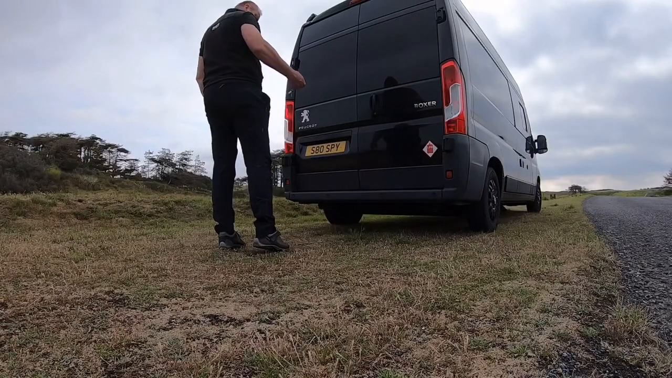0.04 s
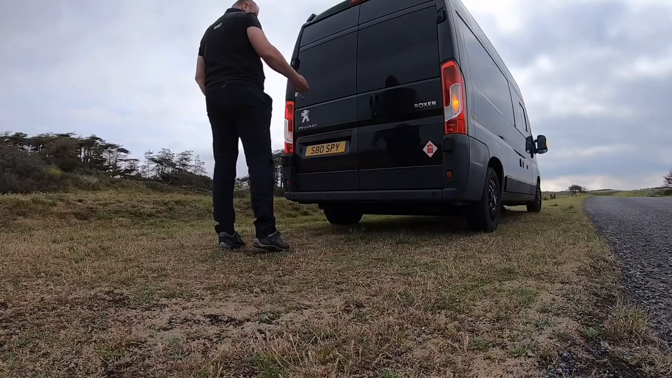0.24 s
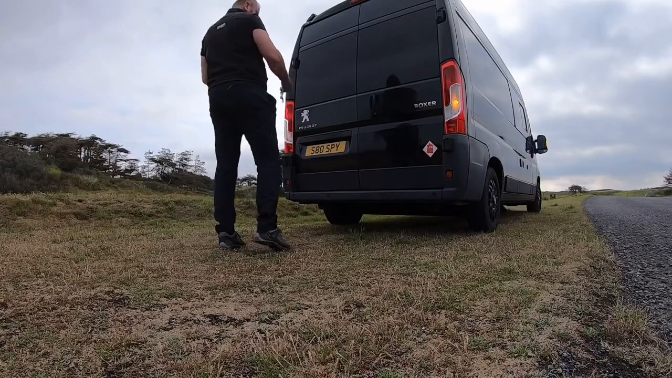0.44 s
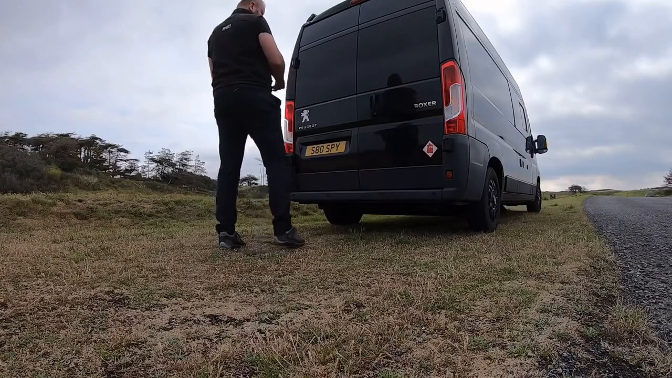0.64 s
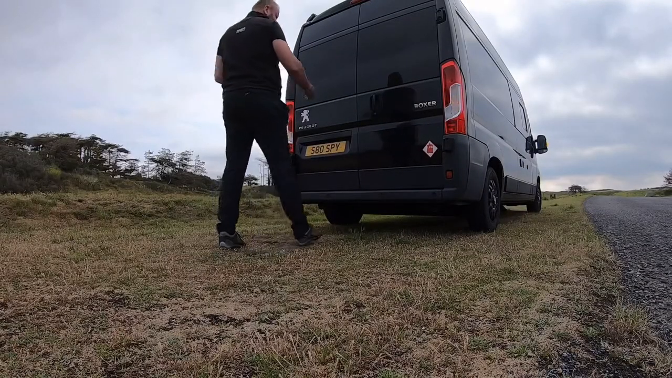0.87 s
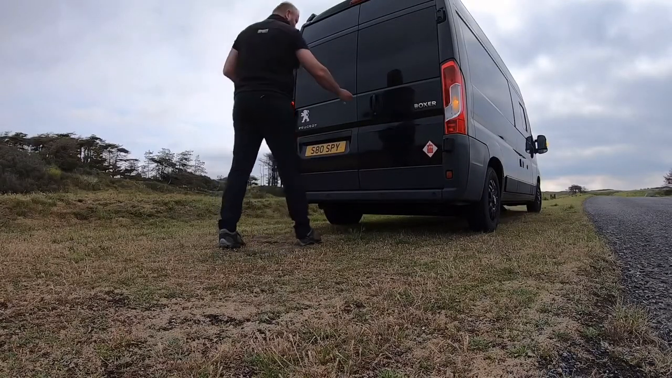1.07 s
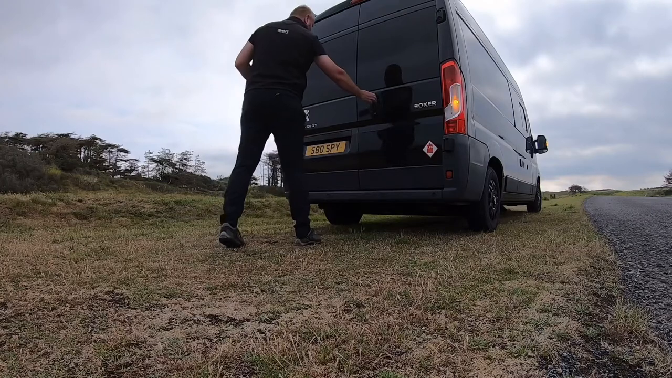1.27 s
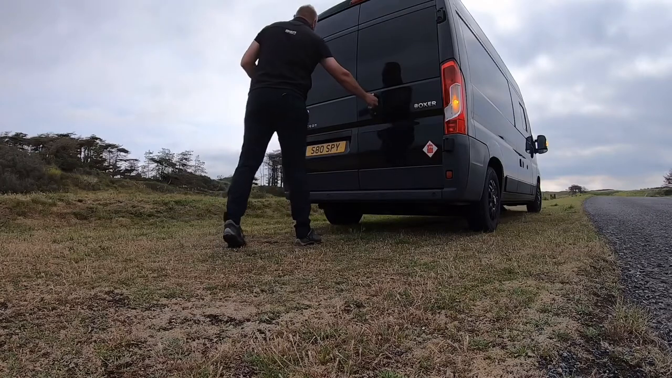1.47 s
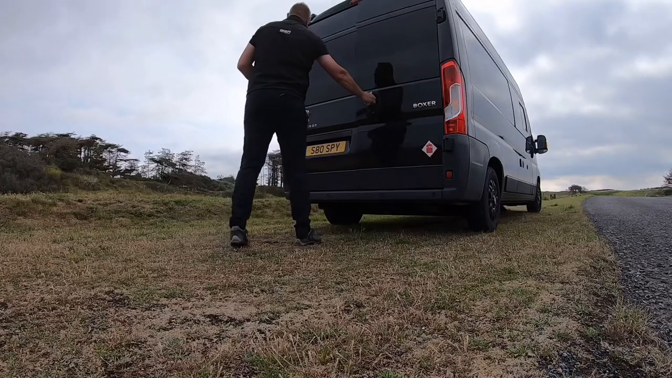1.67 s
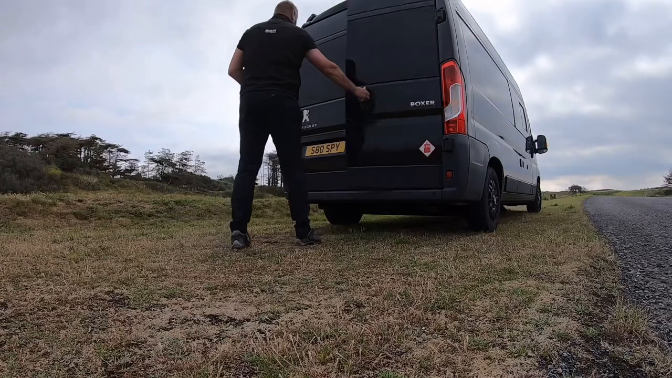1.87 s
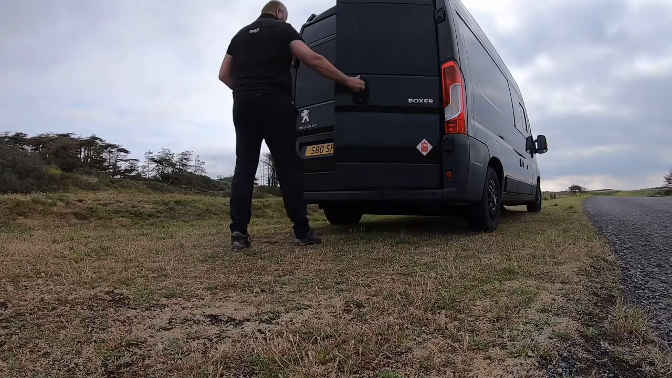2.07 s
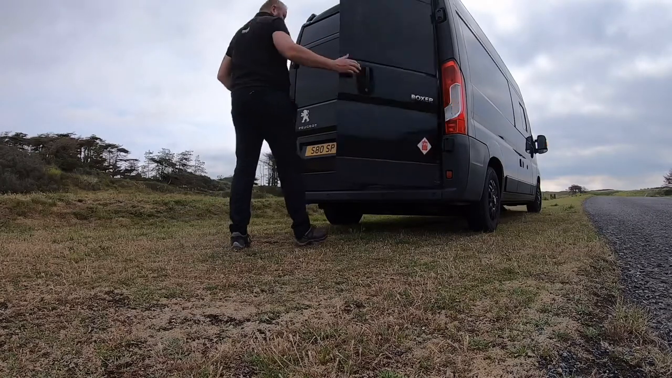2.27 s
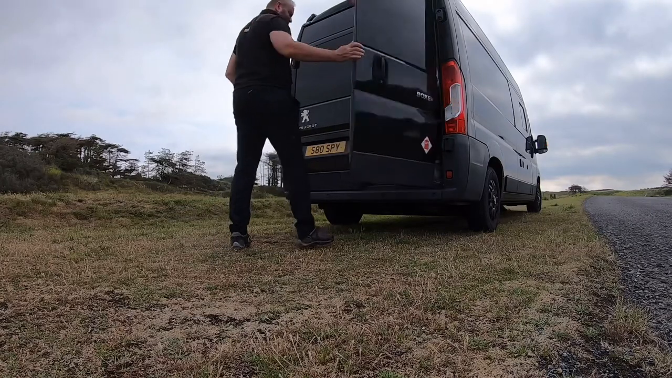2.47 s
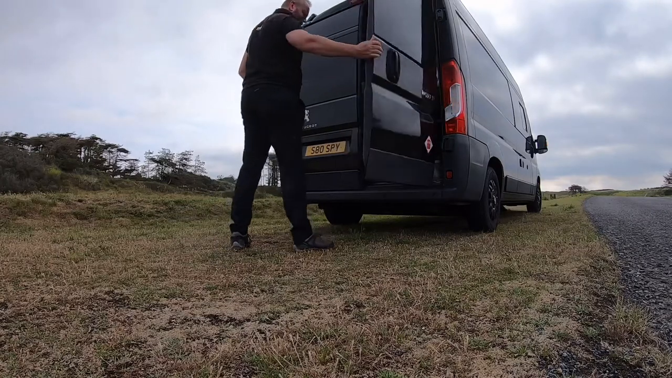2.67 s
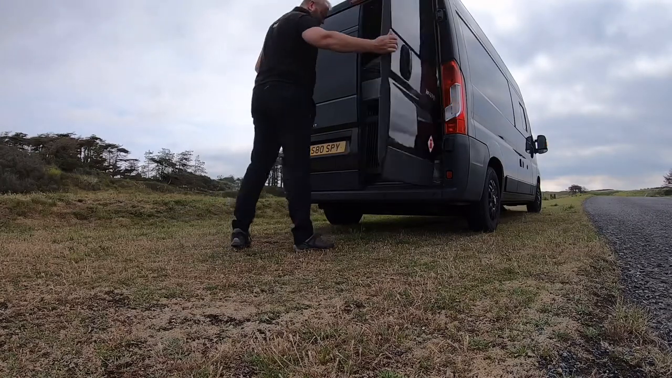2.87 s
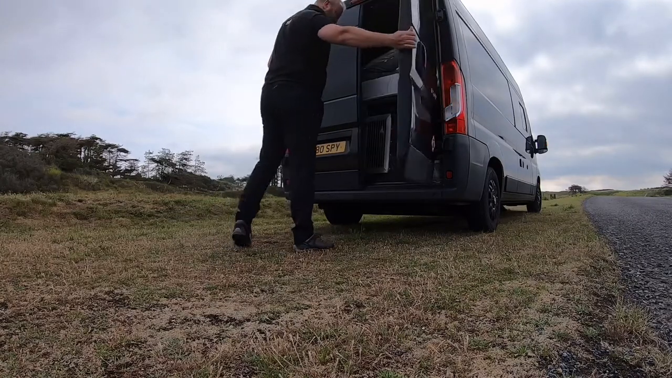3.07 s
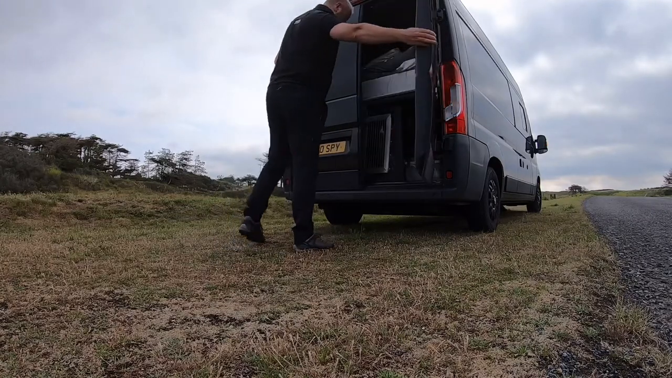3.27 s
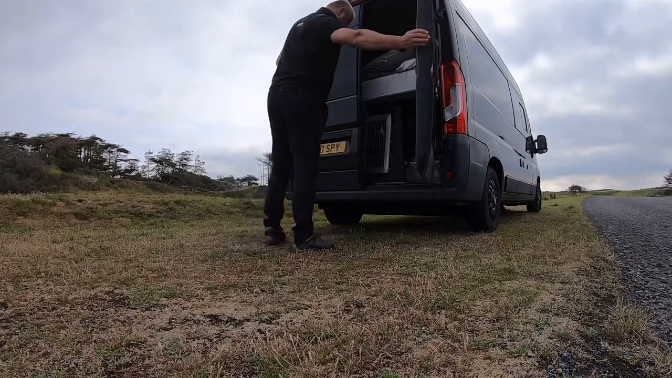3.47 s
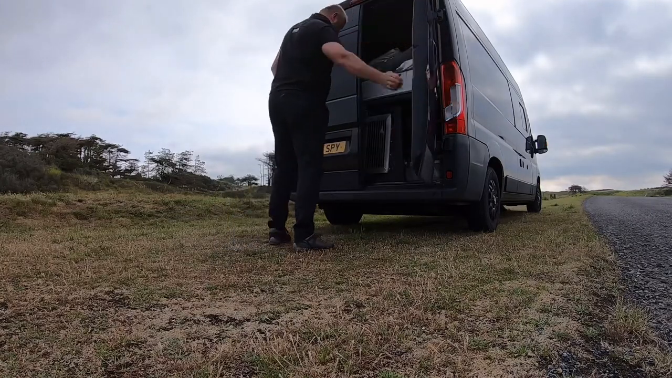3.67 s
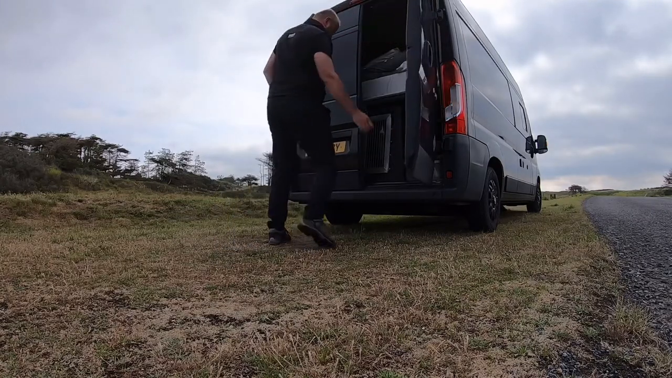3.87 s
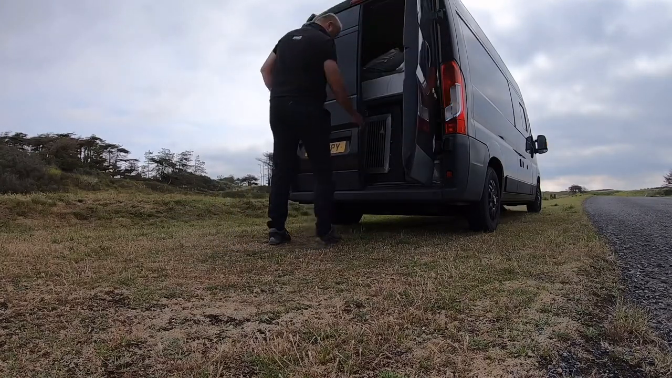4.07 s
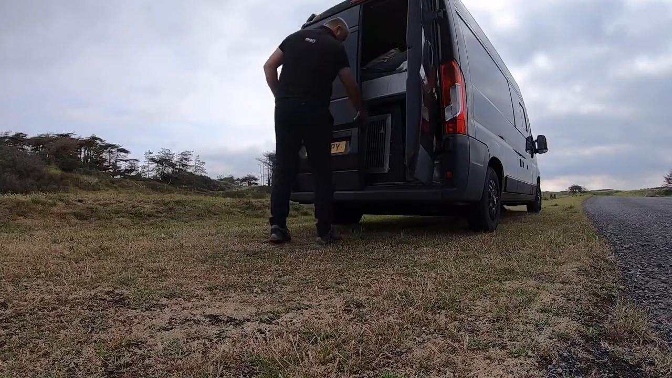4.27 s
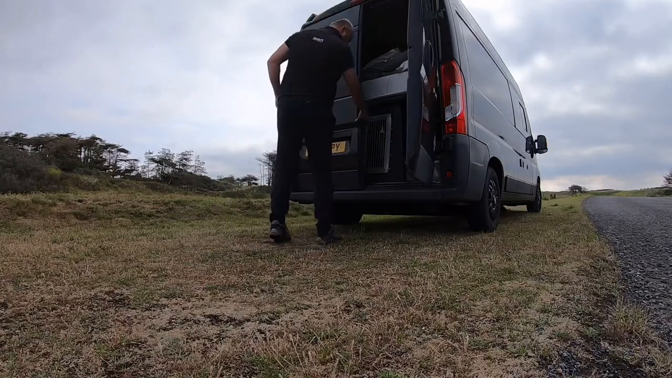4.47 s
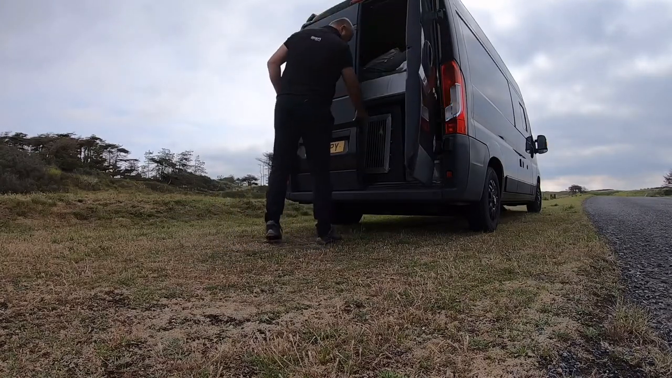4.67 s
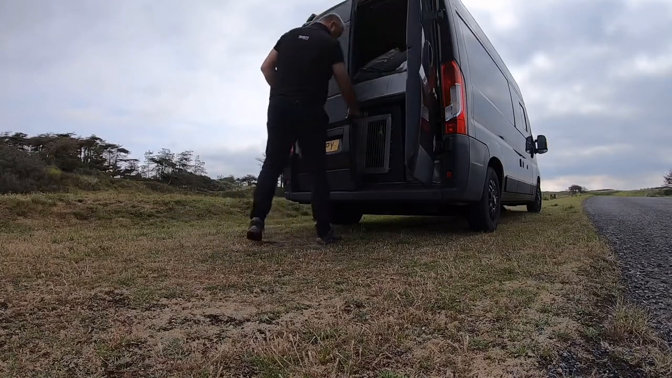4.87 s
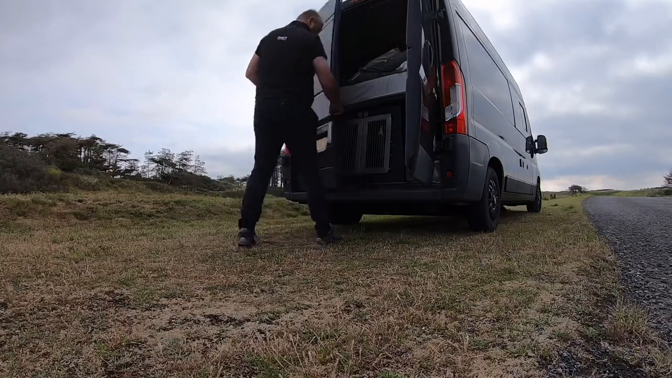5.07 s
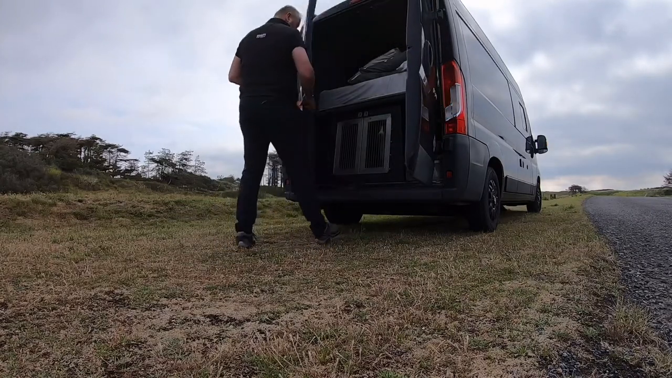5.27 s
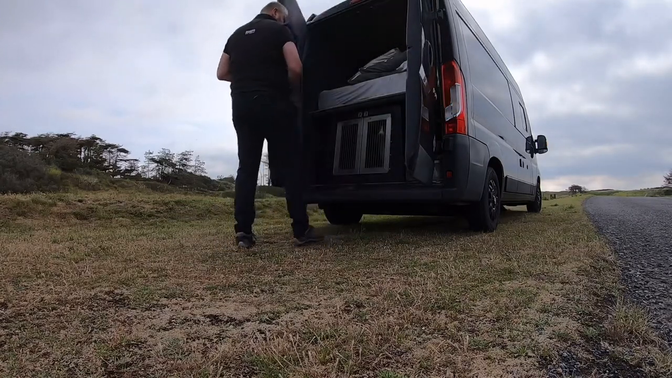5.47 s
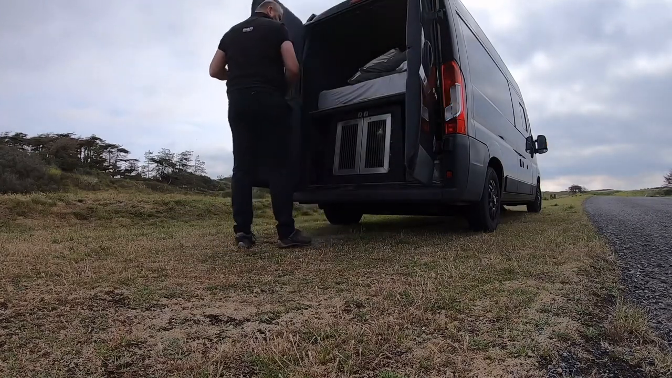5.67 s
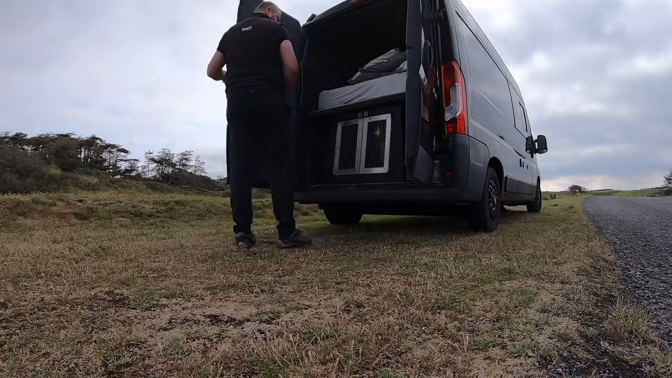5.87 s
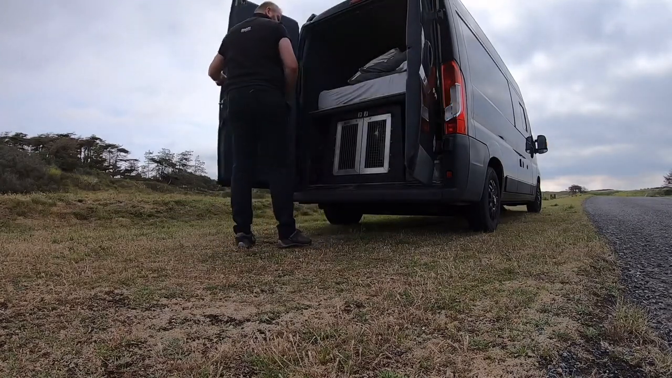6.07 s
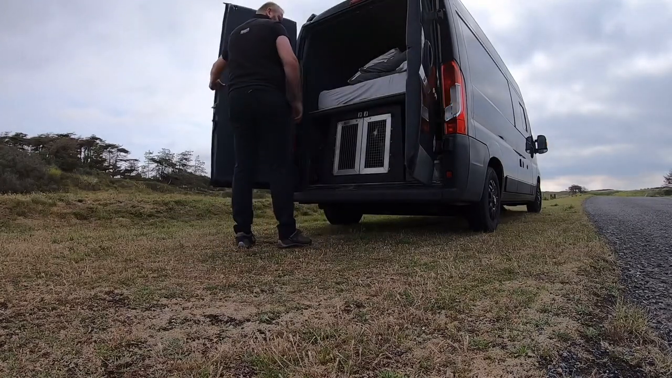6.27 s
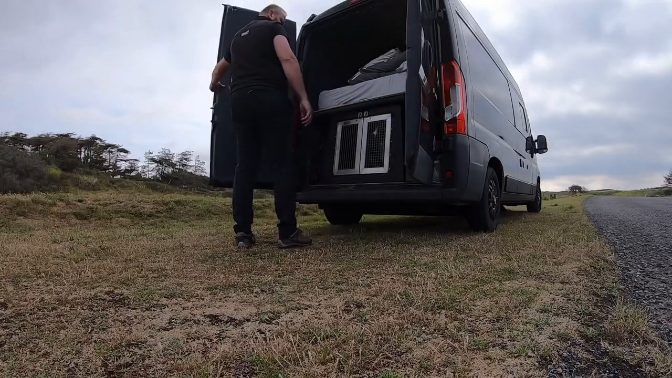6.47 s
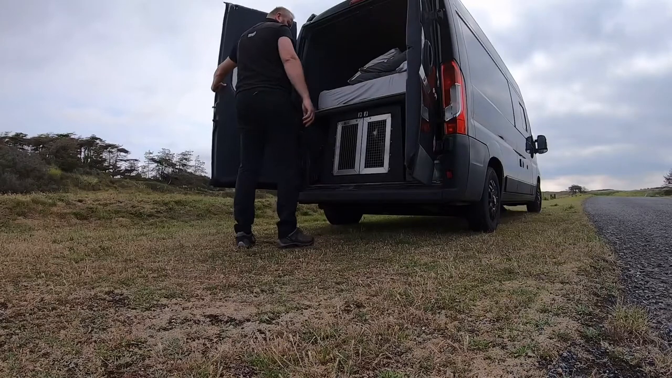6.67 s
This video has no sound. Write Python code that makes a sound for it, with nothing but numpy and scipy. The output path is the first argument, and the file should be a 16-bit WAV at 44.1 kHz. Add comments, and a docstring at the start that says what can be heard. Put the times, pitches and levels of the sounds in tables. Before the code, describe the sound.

Keys jingle beside a van, then its rear door latches clunk loudly and release, with hollow body thuds, light rattles, breeze and faint birdsong outdoors.

```python
"""Windy grass verge: the rear doors of a van are unlatched and swung open.
Blows set door modes ringing, latch parts rattling as banded noise and the body humming.
Keys, handle, pawl, hinge stay and inner lever are scratch-excited modes.
Random snaps give the rustle of dry grass and the hiss of the doors after blows.
Wind and body rumble, far traffic and breeze are coloured noise; a far bird is gliding sines."""
import sys
import numpy as np
from scipy import signal
from scipy.fft import rfft, irfft
from scipy.io import wavfile

SR = 44100
rng = np.random.default_rng(int(sys.argv[2]) if len(sys.argv) > 2 else 0)


def unload_wav(signal):
    """Save mono or channel-first audio to the path in sys.argv[1] as 16-bit WAV at rate SR, clipped to [-1, 1]."""
    wavfile.write(
        sys.argv[1],
        SR,
        np.round(np.clip(np.atleast_2d(signal).T, -1, 1) * 32767).astype(np.int16),
    )


N = 296352
CONTROL_STEP = 32   # samples between swell levels
DRIFT_STEP = 40   # samples between drift values
BAND_EDGES_HZ = 60 * 2 ** np.arange(0, 8.1, .5)   # half octaves
MODE_SPREAD_DB, TIGHT_SPREAD_DB = 2.5, 1.2   # random spread of each mode's strength per touch


def from_db(db):
    """Decibels to gain."""
    return 10 ** (np.asarray(db) / 20)


def rms_one(x):
    """Scale to unit rms."""
    return x / np.sqrt(np.mean(x ** 2) + 1e-20)


def at_hz(points, hz):
    """Interpolate a curve on a log-frequency axis."""
    curve_hz, values = np.array(points).T
    return np.interp(np.log(hz), np.log(curve_hz), values)


def drift(rate_hz):
    """Slow random signal of rms 1: noise through two equal real poles."""
    pole = np.exp(-2 * np.pi * DRIFT_STEP * rate_hz / SR)
    white = rng.standard_normal(N // DRIFT_STEP + 2002)
    slow = signal.lfilter([1], [1, -2 * pole, pole * pole], white)[2000:]
    return np.interp(np.arange(N) / DRIFT_STEP, np.arange(len(slow)), rms_one(slow))


def band(x, low_hz, high_hz):
    """Butterworth band-pass."""
    sos = signal.butter(2, [low_hz, high_hz], "band", fs=SR, output="sos")
    return signal.sosfilt(sos, x)


def ring(clicks, hz, t60_s):
    """Two-pole resonator: a unit click starts a decaying sine of height 1."""
    r = from_db(-60 / (t60_s * SR))
    w = 2 * np.pi * hz / SR
    return signal.lfilter([0, np.sin(w)], [1, -2 * r * np.cos(w), r * r], clicks + 1e-18)


def stereo(mid, side, alike):
    """Mid and side to left and right; independent inputs of equal power correlate by alike."""
    alike = np.clip(alike, -1, 1)
    return np.sqrt(1 + alike) * mid + np.sqrt(1 - alike) * side * [[1], [-1]]


def coloured(spectrum, alike):
    """Stereo noise of rms 1 with a spectrum and a likeness by frequency."""
    hz = np.maximum(np.arange(N // 2 + 1) * SR / N, 1)
    mid, side = rfft(rng.standard_normal((2, N))) * from_db(at_hz(spectrum, hz))
    return rms_one(irfft(stereo(mid, side, at_hz(alike, hz)), N))


def swell(start_s, hold_s, level_db, rise_s, fall_s):
    """One swell in dB: climb, hold, fall; rise_s and fall_s each span 40 dB."""
    t = np.arange(0, N + CONTROL_STEP, CONTROL_STEP) / SR
    before = (start_s - t) / rise_s
    after = (t - start_s - hold_s) / fall_s
    return level_db - 40 * np.maximum(0, np.maximum(before, after))


def summed(levels_db, rest_db):
    """Gain of overlapping swells, added as power over a resting level."""
    power = from_db(rest_db) ** 2 + np.sum(from_db(levels_db) ** 2, axis=0)
    return np.interp(np.arange(N) / CONTROL_STEP, np.arange(len(power)), np.sqrt(power))


def struck(events, modes, spread_db, crack_db, crack_t60_s, alike):
    """Each touch is a decaying noise scratch: it excites every mode and is heard itself as a crack."""
    at_s, level_db = np.array(events).T
    at = (at_s * SR).astype(int)
    luck = rng.normal(0, 1, (len(at), len(modes)))
    clicks = np.zeros((2, N))
    noise = stereo(*rng.standard_normal((2, N)), alike)
    fade = from_db(-60 / (crack_t60_s * SR))
    out = 0
    for k, (hz, mode_db, t60_s) in enumerate(modes):
        clicks[:, at] = from_db(level_db + mode_db + spread_db * luck[:, k])
        # unit-energy scratch
        scratch = signal.lfilter([np.sqrt(1 - fade ** 2)], [1, -fade], clicks) * noise
        out = out + ring(scratch, hz, t60_s)
    clicks[:, at] = from_db(level_db + crack_db)
    crack = signal.lfilter([1], [1, -fade], clicks) * noise
    return out + band(crack, modes[0][0], modes[-1][0])


# far traffic and breeze spectrum: pitch_hz, relative_level_db_per_hz
AIR_SPECTRUM = [(59, -34), (105, -24), (177, 11), (437, -14.5), (517, -10), (821, 0.5), (1010, -7.5),
                (2670, -12), (6740, -20), (8150, -27), (9060, -20), (15300, -41)]
# left-right likeness: pitch_hz, likeness
AIR_LIKENESS = [(100, 0.32), (400, .9), (1000, 0.28), (4000, 0.95), (12000, 0.13)]
# level curve: time_s, level_db
AIR_LEVEL = [(0, -73.5), (1.3, -71.5), (2.8, -73.5), (3.5, -72), (4.4, -71.5), (5.6, -72.5), (6.0, -73),
             (6.72, -74.5)]


def air():
    """Far traffic and breeze: steady coloured noise on a slowly drifting level."""
    time_s, level_db = np.transpose(AIR_LEVEL)
    level_db = np.interp(np.arange(N) / SR, time_s, level_db)
    return from_db(level_db + 1.2 * drift(3.4)) * coloured(AIR_SPECTRUM, AIR_LIKENESS)


# rumble spectrum: pitch_hz, relative_level_db_per_hz
RUMBLE_SPECTRUM = [(14, -30), (25, -9.5), (40, 0), (80, -1.5), (130, -11.5), (250, -33), (400, -76.5)]
# left-right likeness: pitch_hz, likeness
RUMBLE_LIKENESS = [(20, .7), (60, .8), (120, .995)]
# wind buffets, and thumps of the van body at heavy blows: start_s, hold_s, level_db
RUMBLES = [(0.0, 0.017, -45), (0.231, 0.11, -38), (.47, 0.014, -47), (1.533, 0.14, -28),
           (1.963, 0.048, -44), (2.107, 0.55, -39.5), (3.035, 0.059, -48), (3.198, 0.1, -48.5),
           (3.8, 0.074, -46), (3.921, 0.16, -43), (4.536, 0.091, -32.5), (4.217, 0.11, -64),
           (4.69, 0.085, -50.5), (5.493, 0.047, -67.5), (5.768, 0.19, -53), (6.09, 0.055, -47.5),
           (6.4, .3, -57.5)]
RUMBLE_RISE_S, RUMBLE_FALL_S, CALM_DB = .05, .18, -86   # rise and fall per 40 dB


def rumble():
    """Low rumbles, partly unlike left to right: wind buffets, and van body thumps at heavy blows."""
    level = summed([swell(*row, RUMBLE_RISE_S, RUMBLE_FALL_S) for row in RUMBLES], CALM_DB)
    return level * from_db(3.0 * drift(12)) * coloured(RUMBLE_SPECTRUM, RUMBLE_LIKENESS)


# dry grass underfoot, and the hiss of the doors after blows:
# start_s, hold_s, level_db, tilt_db_per_octave
RUSTLES = [(0.0, 0.19, -71.5, 11), (0.226, 0.062, -53, -14), (0.327, .12, -65, 4), (.56, 0.11, -62, 15),
           (0.812, 0.068, -60.5, 7.5), (1.045, 0.82, -61, -2.5), (1.6, 0.29, -70, -17.5),
           (1.854, 0.29, -50, -7.5), (2.203, 0.11, -60, -12), (2.603, 0.058, -62.5, -7.5),
           (2.9, 0.29, -66, -7), (3.493, .05, -60, -6.5), (3.823, 0.052, -61.5, 5),
           (4.052, 0.093, -60.5, 7.5), (4.225, .12, -71, 0.5), (4.6, 0.18, -63, -10.5),
           (4.992, 0.65, -60, -10.5), (5.442, 0.018, -62.5, 13.5), (6.271, 0.047, -72, 4.5)]
# rustle spectrum: pitch_hz, relative_level_db_per_half_octave
RUSTLE_SPECTRUM = [(500, -24), (1000, -8.5), (2000, -1), (3500, 2), (7000, -15), (12000, -18.5)]
RUSTLE_RISE_S, RUSTLE_FALL_S, STILL_DB = 0.052, .22, -82   # rise and fall per 40 dB
SNAPS_PER_S, SNAP_SPREAD_DB, PATCHY_DB = 2500, 2.8, 2.2


def rustle():
    """Rustling swells of dense snaps: dry grass underfoot, and the hiss of the doors after blows."""
    sizes_db = SNAP_SPREAD_DB * np.minimum(rng.exponential(1, (2, N)), 5)
    sizes = from_db(sizes_db) * rng.choice([-1, 1], (2, N))
    snaps = sizes * (rng.random((2, N)) < SNAPS_PER_S / SR)
    levels_db = np.array([swell(*row[:3], RUSTLE_RISE_S, RUSTLE_FALL_S) for row in RUSTLES])
    tilt_db = np.array(RUSTLES)[:, 3:]
    out = 0
    for low_hz, high_hz in zip(BAND_EDGES_HZ[6:], BAND_EDGES_HZ[7:]):
        hz = np.sqrt(low_hz * high_hz)
        octaves = np.log2(min(hz, 7000) / 2500)
        level = summed(levels_db + tilt_db * octaves, STILL_DB)
        colour = from_db(at_hz(RUSTLE_SPECTRUM, hz) + PATCHY_DB * drift(18))
        out = out + rms_one(band(snaps, low_hz, high_hz)) * level * colour
    return from_db(-14.0 + 0.5 * drift(25)) * stereo(*out, 0.084)


# blows on the doors: time_s, crack_db, crack_centre_octaves_over_1_khz,
# thud_db, thud_centre_octaves_over_100_hz
BLOWS = [(0.0044, -47.5, 0.5, -48, 1.18), (0.2026, -44, 0.1, -49, 1), (0.2329, -38.5, 1.12, -41, 3.2),
         (0.2493, -30.5, 1.1, -59, 1.2), (0.275, -34, 0.5, -36.5, 1.45), (0.6068, -50.5, 0.8, -52, 2.24),
         (1.1042, -61, 2.1, -97, 1), (1.4346, -48.5, 0.74, -41.5, 0.94), (1.4624, -48.5, 1, -42, 1.13),
         (1.5183, -42, 1, -28.5, 3), (1.5357, -20, 2, -9.5, 0.61), (1.562, -24, 1, -33, -0.019),
         (1.582, -38.5, 1.7, -26, 0.77), (1.625, -37, 1.53, -42, 0.36), (1.6481, -28.5, .8, -31, 2.7),
         (1.8462, -33, 1.54, -39, .8), (2.0465, -41, 2.4, -45, 0.75), (2.107, -14.5, 1.2, -8.5, 1.08),
         (2.2995, -50, 0.47, -31.5, 0.97), (2.4214, -65, 2, -43, 0.12), (2.5867, -56, 0.84, -42, -0.61),
         (2.9629, -59, 0.75, -55.5, 0.35), (3.0353, -71.5, 1, -32.5, 0.93), (4.061, -45, 1, -54, 1.1),
         (4.365, -78.5, 2, -56, 0.93), (4.4651, -48.5, 1.9, -48.5, 2.7), (4.5144, -19, 2, -29.5, 3.1),
         (4.528, -26, 0.8, -28.5, 0.61), (4.5514, -36, 0.9, -30, 0.33), (4.57, -57, -1.5, -32, -0.64),
         (4.625, -52.5, 0.5, -28.5, -0.088), (4.8141, -60.5, 1.5, -47, -0.21),
         (4.9177, -56.5, 0.9, -63.5, 1.3), (4.9492, -45, 1, -51, 0.55), (5.01, -45.5, 0.66, -36, 1.27),
         (5.2894, -51.5, 0.73, -65, .8), (5.451, -43.5, 3.04, -44, 3.6), (5.464, -33.5, .5, -29.5, 0.93),
         (5.627, -55.5, 0.76, -49, 0.35), (5.7638, -83.5, -3, -50, 1.07), (5.8023, -81, -0.2, -36.5, 0.25),
         (6.085, -91.5, -6.5, -34.5, 0.49), (6.2, -90, 1, -48, 0.17)]


def hump_db(peak_db, centre_hz, hz, fall_below, fall_above):
    """Spectral hump; falls are in dB per octave squared."""
    fall = fall_above if hz > centre_hz else fall_below
    return peak_db - fall * np.log2(hz / centre_hz) ** 2


def blow_db(blow, hz):
    """Strength of one blow at a pitch: crack and thud humps added as power."""
    _, crack_db, crack_octaves, thud_db, thud_octaves = blow
    crack = hump_db(crack_db, 1000 * 2 ** crack_octaves, hz, fall_below=3, fall_above=11)
    thud = hump_db(thud_db, 100 * 2 ** thud_octaves, hz, fall_below=1.5, fall_above=10)
    return 10 * np.log10(from_db(crack) ** 2 + from_db(thud) ** 2)


# decay time against CLATTER_T60_S: pitch_hz, factor
CLATTER_LINGER = [(80, 3.5), (250, 2.4), (800, 0.46), (3000, 0.41), (12000, 0.22)]
# what the panel radiates of a clatter: pitch_hz, gain_db
PANEL_RADIATION = [(70, -38), (150, -19), (300, -11.5), (500, -6), (700, 2), (1700, -7), (2600, -3),
                   (9500, -2.5), (11500, -27), (15000, -35.5)]
# likeness at the two microphones, also for the panels: pitch_hz, likeness
DOOR_LIKENESS = [(60, 0.3), (120, 0.97), (350, 1), (600, .88), (2500, .92), (5000, 1), (8000, 0.13)]
CLATTER_T60_S = .13


def clatter(gain_db, tail_db, tail_times, rise_s, grain_db):
    """Latch parts rattle: noise dies band by band, fast at first, then slowly in the van body."""
    out = np.zeros((2, N))
    t = np.arange(SR // 2) / SR
    white = rng.standard_normal((2, 2, N)) * from_db(grain_db * drift(220))
    rise = 1 - np.exp(-t / max(rise_s, 1e-4))
    for k, (low_hz, high_hz) in enumerate(zip(BAND_EDGES_HZ, BAND_EDGES_HZ[1:])):
        hz = np.sqrt(low_hz * high_hz)
        slope_db = -60 * t / (CLATTER_T60_S * at_hz(CLATTER_LINGER, hz))
        decay = from_db(slope_db) + from_db(tail_db + slope_db / tail_times)
        envelope = np.full(N + SR, 1e-9)
        for blow in BLOWS:
            i = round(blow[0] * SR)
            envelope[i:i + len(t)] += from_db(blow_db(blow, hz)) * rise * decay
        part = band(white[k % 2] * envelope[:N], low_hz, high_hz)
        part *= np.sqrt(SR / (high_hz - low_hz))   # undo the bandwidth loss
        out += from_db(at_hz(PANEL_RADIATION, hz)) * stereo(*part, at_hz(DOOR_LIKENESS, hz))
    return from_db(gain_db) * out


# door panel and latch modes: pitch_hz, relative_level_db, t60_s
DOOR_MODES = [(85, -24, .3), (145, -13, .3), (186.4, -1.5, 0.14), (231.2, -4.5, 0.19), (287.4, -8.5, 0.2),
              (336.6, -5.5, 0.11), (451.2, -1.5, 0.095), (545, -12, 0.053), (773, -12.5, 0.27),
              (1294, -8, 0.035), (2057, -12.5, 0.055), (2676, -9, 0.02), (3355, -14.5, .05)]


def panels(gain_db, spread_db):
    """Every blow rings the door's modes, each as hard as the blow is at that pitch."""
    at = [round(blow[0] * SR) for blow in BLOWS]
    out = np.zeros((2, N))
    luck = rng.normal(0, 1, (len(at), len(DOOR_MODES)))
    for k, (hz, level_db, t60_s) in enumerate(DOOR_MODES):
        sign = (-1) ** k
        clicks = np.zeros(N)
        clicks[at] = from_db([blow_db(blow, hz) for blow in BLOWS] + spread_db * luck[:, k])
        # rubber seals round off the contact; neighbouring modes start opposed
        soft = band(clicks, .6 * hz, 1.7 * hz) * sign
        rung = ring(soft, hz, t60_s) * from_db(level_db)
        # each mode radiates from another part of the door: alternate modes lean left and right
        out += stereo(rung, rung * sign, at_hz(DOOR_LIKENESS, hz))
    return from_db(gain_db) * out


# body resonances: pitch_hz, width_hz, relative_level_db
BODY_RESONANCES = [(150, 13, -4), (173, 99, 3), (260, 57, -10), (300, 21, -12)]
# body hum while the handle bounces or a door swings: start_s, hold_s, level_db
HUMS = [(1.872, 0.12, -42.5), (2.297, 0.14, -58), (4.7, 0.086, -54.5), (5.09, 0.11, -51.5),
        (5.55, 0.058, -58.5)]
BOOM_UNDER_THUD_DB, BOOM_REST_DB = 19.5, -96
BOOM_RISE_S, BOOM_FALL_S = 0.034, 0.36   # per 40 dB


def boom():
    """The hollow van body hums after every thud and while the handle bounces or a door swings."""
    white = rng.standard_normal(N)
    hum = 0
    for hz, width_hz, level_db in BODY_RESONANCES:
        hum = hum + from_db(level_db) * rms_one(ring(white, hz, 2.2 / width_hz))
    thuds = [(blow[0] + BOOM_RISE_S, 0, blow[3] - BOOM_UNDER_THUD_DB) for blow in BLOWS]
    swells = [swell(*row, BOOM_RISE_S, BOOM_FALL_S) for row in thuds + HUMS]
    return summed(swells, BOOM_REST_DB) * rms_one(hum)


# keys touch: time_s, small_keys_db, big_key_db
JINGLE = [(0.0499, -38, -62), (0.129, -47, -76), (0.314, -52.5, -66), (0.3347, -56, -67),
          (0.5344, -53, -66), (0.5643, -36.5, -55.5), (0.6245, -48, -56), (0.6613, -34, -50.5),
          (0.6928, -48, -62), (0.741, -71, -55.5), (0.768, -43.5, -59), (0.7927, -50, -67),
          (0.832, -45, -73), (0.8696, -47, -62), (0.8802, -65, -80), (0.9875, -51, -73), (1.1677, -59, -82),
          (1.241, -47.5, -71), (1.416, -55.5, -88), (1.472, -48, -60)]
# small key modes: pitch_hz, relative_level_db, t60_s
SMALL_KEY_MODES = [(6500, -16, .008), (7900, -9, .015), (8280, -4, .045), (9600, -9, .012),
                   (11500, -18, .008)]
# big key modes: pitch_hz, relative_level_db, t60_s
BIG_KEY_MODES = [(3794, 3.5, 0.024), (4310, -1.5, 0.01), (5700, -13, 0.021)]


def keys():
    """A bunch of small keys and one big one knock together, each touch ringing their modes."""
    rows = np.array(JINGLE)
    small = struck(rows[:, :2], SMALL_KEY_MODES, MODE_SPREAD_DB,
                   crack_db=-10.5, crack_t60_s=0.042, alike=0.15)
    big = struck(rows[:, ::2], BIG_KEY_MODES, MODE_SPREAD_DB,
                 crack_db=2.5, crack_t60_s=0.069, alike=0.91)
    return from_db(-10.5) * small + big


# bird notes: start_s, length_s, first_hz, middle_hz, last_hz, level_db, pulses_per_s (0 = plain)
SONG = [(.06, .05, 4650, 4850, 5000, -80, 0), (.08, .04, 3980, 4020, 4050, -80, 0),
        (.345, .08, 4550, 4750, 4900, -83, 0), (.35, .08, 3900, 3960, 4040, -86, 0),
        (2.18, .04, 4700, 5300, 5800, -66, 0), (5.3, .125, 3690, 3610, 2950, -73, 0),
        (5.535, .162, 4200, 4230, 4420, -73, 0), (5.695, .03, 4420, 3900, 3500, -73, 0),
        (5.82, .012, 4300, 4000, 3700, -70, 0), (5.9, .27, 3720, 4050, 4150, -78, 55.4),
        (6.16, .06, 3300, 3420, 3550, -78, 0), (6.4, .015, 4200, 4000, 3800, -76, 0),
        (6.49, .01, 3500, 3300, 3100, -72, 0), (6.505, .013, 3700, 3470, 3250, -70, 0),
        (6.522, .018, 3500, 3380, 3300, -70, 0), (6.54, .158, 3300, 3120, 3010, -70, 0)]
NOTE_FADE_DB = 5   # drop over each note


def bird():
    """Thin whistles with soft ends; pitch bends through first, middle and last."""
    out = np.zeros(N)
    for start_s, length_s, first_hz, middle_hz, last_hz, level_db, pulses_per_s in SONG:
        i = np.arange(round(start_s * SR), min(round((start_s + length_s) * SR), N))
        u = (i - i[0]) / len(i)
        bend_hz = 4 * middle_hz - 2 * first_hz - 2 * last_hz
        hz = first_hz * (1 - u) + last_hz * u + bend_hz * u * (1 - u)
        ends = np.clip(np.minimum(i - i[0], i[-1] - i) / (0.003 * SR), 0, 1)
        if pulses_per_s > 20:
            ends = ends * np.cos(np.pi * pulses_per_s * u * length_s) ** 2
        whistle = np.sin(2 * np.pi * np.cumsum(hz) / SR)
        out[i] += ends * from_db(level_db - NOTE_FADE_DB * u) * whistle
    return out * from_db(2.5 * drift(30)) * from_db([[-5], [3]])   # louder on the right


# handle hits its stop: time_s, level_db
BOUNCES = [(1.8746, -33), (1.9091, -30.5), (1.941, -33.5), (1.9649, -33), (1.9854, -38.5), (2.0018, -51)]
# handle modes: pitch_hz, relative_level_db, t60_s
HANDLE_MODES = [(1330, 0, .02), (1520, -1, .016), (2900, -6, .006), (4300, -9, .005), (5800, -12, .004),
                (9300, -16, .005)]


def handle():
    """The sprung handle bounces on its stop; each contact rings short metal modes."""
    hits = struck(BOUNCES, HANDLE_MODES, TIGHT_SPREAD_DB, crack_db=-8, crack_t60_s=.005, alike=0.88)
    return hits * from_db([[-3.7], [-2.3]])


# pawl slips, then lets go: time_s, level_db
PAWL_SLIPS = [(2.0975, -31.5), (2.1075, -18.5)]
# pawl modes: pitch_hz, relative_level_db, t60_s
PAWL_MODES = [(2560, 3.5, 0.022), (4740, -10.5, 0.013), (9300, -25, .01)]


def pawl():
    """The latch pawl slips and lets go, ringing its small stiff modes."""
    return struck(PAWL_SLIPS, PAWL_MODES, MODE_SPREAD_DB, crack_db=-15, crack_t60_s=0.056, alike=0.93)


# hinge stay ticks: time_s, level_db
STAY_TICKS = [(3.164, -62), (3.223, -59), (3.264, -56), (3.321, -56), (3.351, -57.5), (3.384, -60.5),
              (3.446, -54.5), (3.485, -57), (3.512, -58), (3.551, -51.5), (3.587, -55.5), (3.619, -72),
              (3.667, -59)]
# stay modes: pitch_hz, relative_level_db, t60_s
STAY_MODES = [(811, 5.5, 0.013), (1400, -8, 0.0077), (2200, -16, 0.0072)]


def stay():
    """The hinge stay ticks as the door swings: strong scratch, short modes."""
    ticks = struck(STAY_TICKS, STAY_MODES, TIGHT_SPREAD_DB,
                   crack_db=11.5, crack_t60_s=0.01383, alike=0.257)
    return ticks * from_db(-7.5)


# second door's inner lever snaps: time_s, level_db
LEVER_SNAPS = [(4.523, -29), (4.551, -43)]
# lever modes: pitch_hz, relative_level_db, t60_s
LEVER_MODES = [(406, -5.5, .15), (681, -16, 0.18), (805, 2, 0.22), (977, -8, 0.099)]


def lever():
    """The second door's inner lever snaps, ringing longer and lower modes."""
    return struck(LEVER_SNAPS, LEVER_MODES, TIGHT_SPREAD_DB, crack_db=-21, crack_t60_s=0.029, alike=1.0)


def scene():
    """All sources at the two microphones."""
    doors = clatter(gain_db=-8, tail_db=-27.5, tail_times=4.0, rise_s=0.003, grain_db=0.5)
    doors += panels(gain_db=-4.0, spread_db=MODE_SPREAD_DB)
    metal = keys() + handle() + pawl() + stay() + lever()
    return air() + rumble() + rustle() + doors + boom() + metal + bird()


def record(dry):
    """Low-pass: 70 dB down from 15.4 kHz up."""
    return signal.sosfilt(signal.cheby2(12, 70, 15400, fs=SR, output="sos"), dry)


dry = scene()
out = record(dry)
unload_wav(out)
```